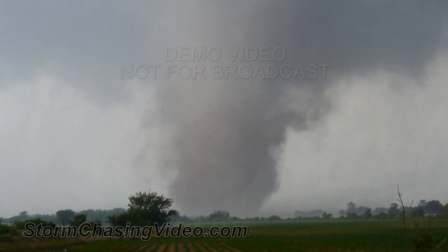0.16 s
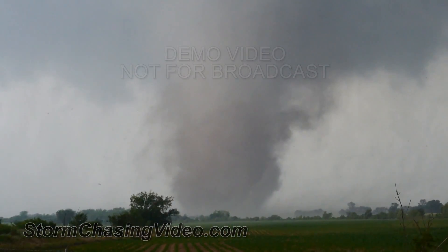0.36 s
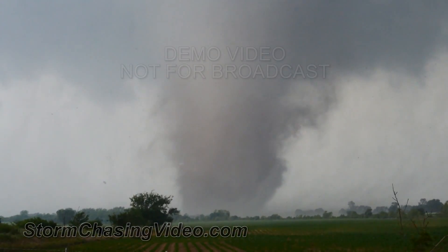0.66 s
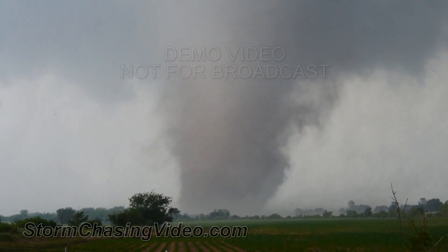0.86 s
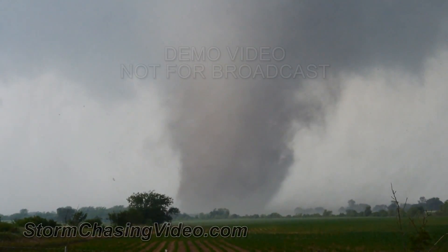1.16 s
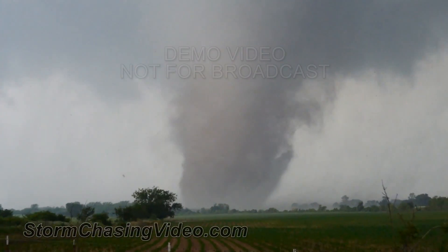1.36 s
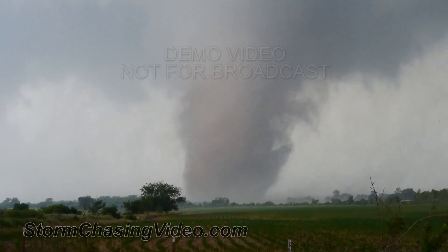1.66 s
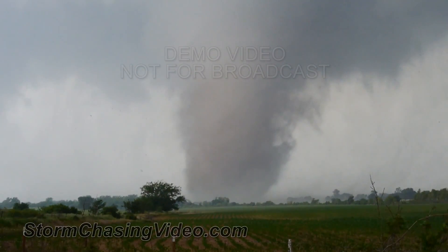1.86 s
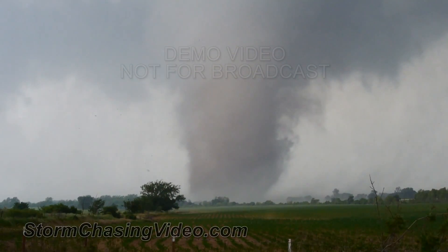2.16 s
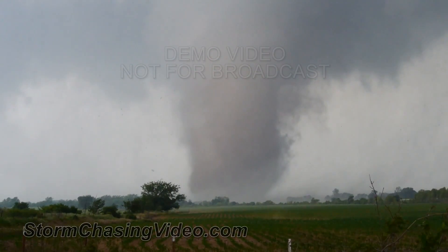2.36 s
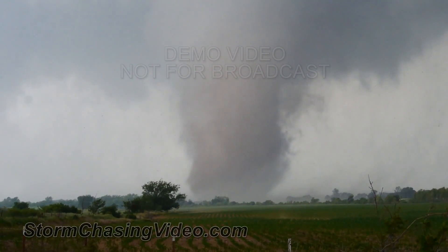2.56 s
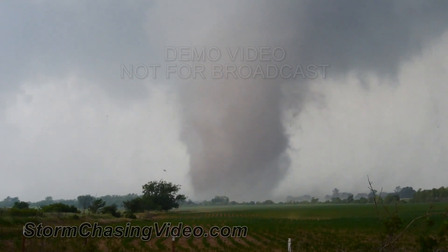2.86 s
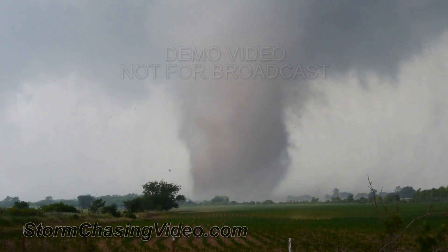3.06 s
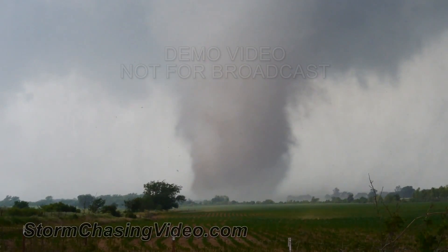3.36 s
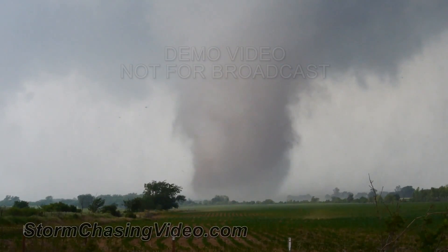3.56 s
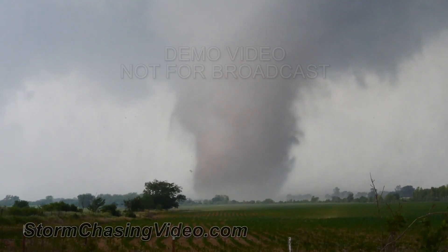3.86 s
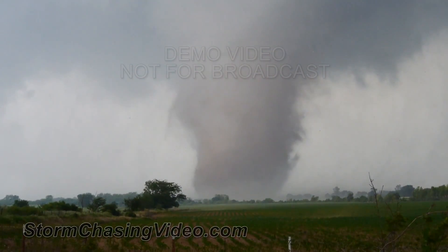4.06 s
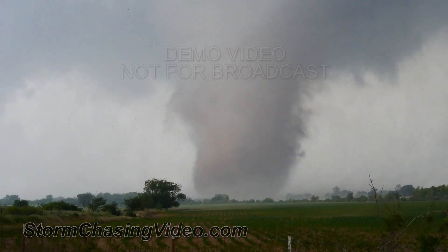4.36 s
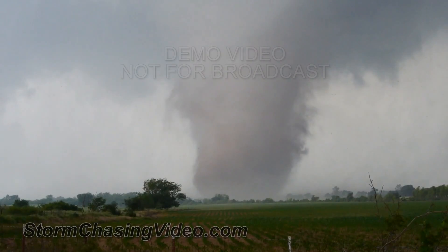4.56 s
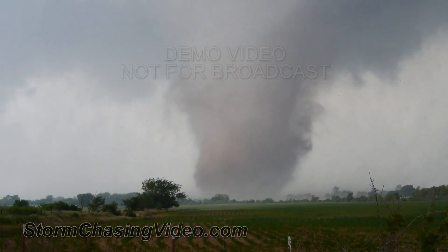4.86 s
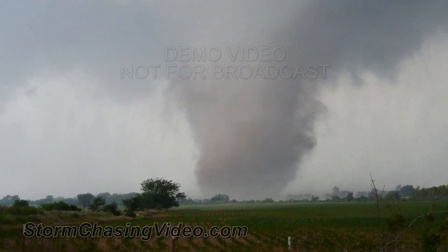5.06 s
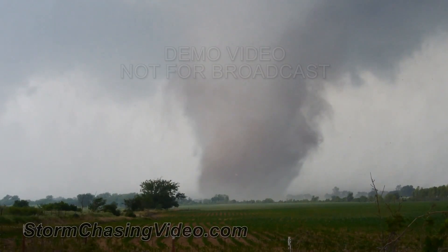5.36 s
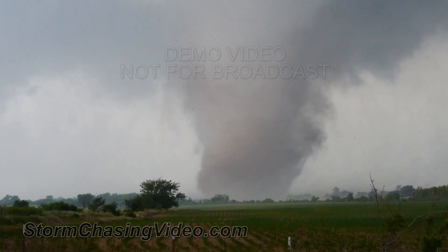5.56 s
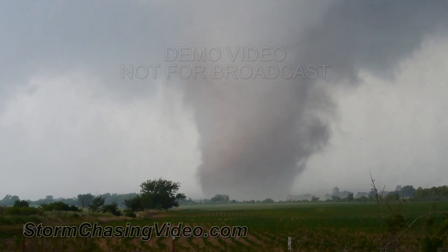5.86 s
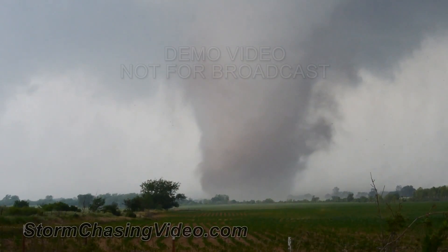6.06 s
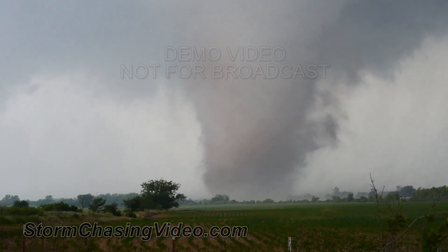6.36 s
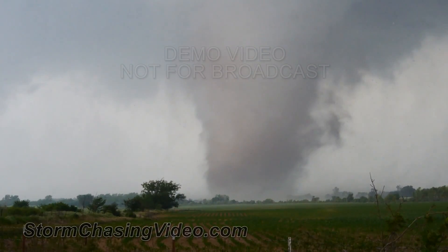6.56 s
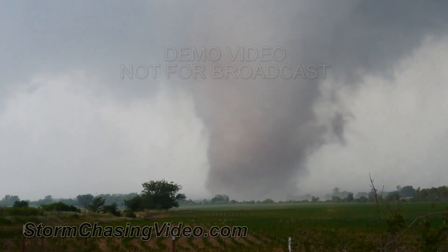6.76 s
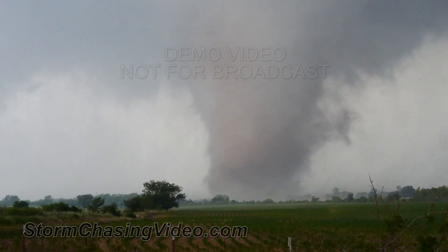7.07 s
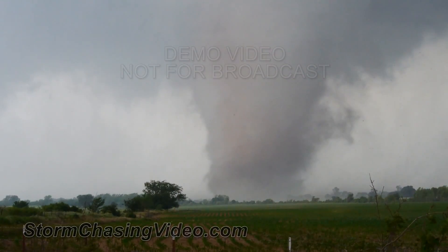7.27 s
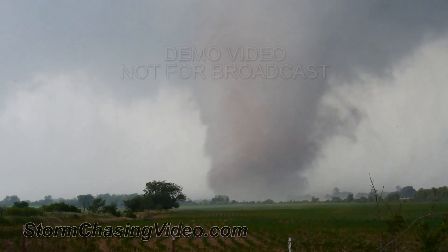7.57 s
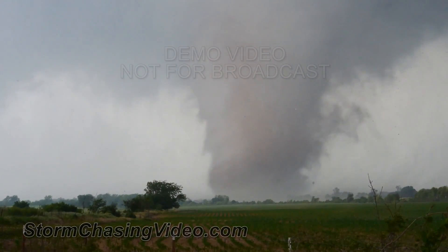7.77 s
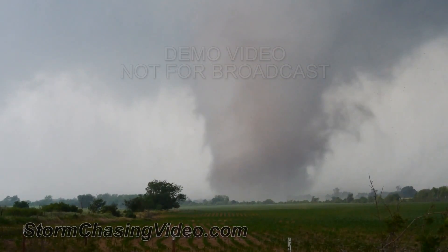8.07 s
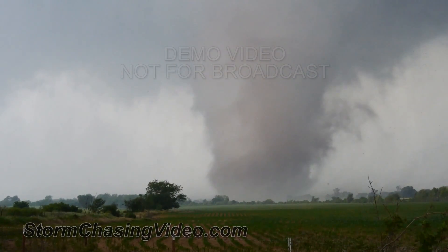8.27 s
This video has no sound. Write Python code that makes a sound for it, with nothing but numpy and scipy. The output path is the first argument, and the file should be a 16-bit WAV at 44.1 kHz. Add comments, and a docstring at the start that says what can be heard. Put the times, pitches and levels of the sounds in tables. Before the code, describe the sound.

Wind buffets a microphone in an open field from the start, with very low swelling pressure, irregular dull thuds and quick fluttering; strong knocks land near 0.25 and 0.8 s. A far tornado roars softly underneath, with a muted rush of air and a faint hiss of grass and leaves. Tiny, thin bird chirps glide by at about 0.9 to 1.1 s. The roar gradually thickens through 2 to 5 s, with a brief hollow note near 3.4 s and heavy wind pushes around 2.6 and 4.1 s, the latter with faint ticks. From 5.4 s the deepest wind pressure eases while the roar climbs, peaking near 6 s in a wavering, low howl. Strong buffeting returns at 6.9 to 7.1 s, briefly ducking everything, with another short chirp. The roar falls back by 7.4 s, then swells again unevenly until the end at about 8.4 s.

```python
"""Gusty wind buffets a microphone: noise bands swell, thud, flutter and ruffle as eddies of every size pass,
with blunt slaps (damped sines), tiny ticks (filtered impulses) and brief changes of level.
Behind it a large tornado roars over open fields and wind hisses through grass and trees: noise bands
that follow one long gust, with a howl that flares into wavering notes. A bird chirps thinly in gliding
harmonics over a faint, wide top hiss. Strong pushes duck the gain of the whole scene."""
import sys
import numpy as np
from scipy import signal
from scipy.fft import rfft, irfft
from scipy.io import wavfile
from scipy.ndimage import uniform_filter1d

SR = 44100
rng = np.random.default_rng(int(sys.argv[2]) if len(sys.argv) > 2 else 0)


def unload_audio(sound):
    """Save the sound as a 16-bit wav file, at the path given as the first command line argument."""
    columns = np.transpose(np.atleast_2d(sound))
    # keep every value between -1 and 1, then stretch to whole-number steps
    steps = np.round(np.clip(columns, -1, 1) * 32767)
    wavfile.write(sys.argv[1], SR, steps.astype(np.int16))


N = 370440

# heard level of the storm before trims, with brief dips:
# (time [s], roar level [dB], rush level [dB], hiss level [dB])
STORM_COURSE = [(0, -36, -38.5, -39.5), (0.35, -39, -42, -41.5), (0.7, -34, -39, -41),
                (0.98, -35.5, -40.5, -41.5), (1.35, -32, -39, -40), (1.8, -32.5, -37.5, -40),
                (2.0, -33, -38.5, -41), (2.7, -34, -40, -44), (2.9, -30.5, -39, -43),
                (3.38, -31, -36, -39.5), (3.52, -31.8, -38.5, -43), (4.1, -29.5, -36.5, -41),
                (4.3, -31, -37, -42), (4.5, -30, -36.5, -41.5), (5.15, -28.5, -35.5, -41.5),
                (5.55, -25, -32.5, -38.5), (6.0, -23, -31, -37.5), (6.27, -24, -31.5, -36.5),
                (6.4, -25, -33.6, -39), (6.84, -26.5, -33.5, -39), (6.885, -27.5, -35.5, -41),
                (7.37, -30, -36, -42.5), (7.47, -28.5, -37.5, -43), (7.75, -25.5, -37.5, -43),
                (7.95, -28, -37, -43), (8.4, -25.5, -33.5, -39.5)]


def from_db(db):
    """Level definition: an amplitude ratio is ten to the power of decibels over twenty."""
    return 10 ** (np.asarray(db) / 20)


def rms_one(x):
    """Power normalization: dividing by the root mean square gives unit power."""
    return x / np.sqrt(np.mean(x ** 2) + 1e-20)


def in_time(rows):
    """Linear interpolation: straight lines join each column of a curve at every sample."""
    s, *columns = np.transpose(rows)
    return [np.interp(np.arange(N) / SR, s, column) for column in columns]


def at_bins(points):
    """Logarithmic frequency scale: a table is read at every FFT bin along log frequency."""
    hz, value = np.transpose(points)
    bin_hz = np.maximum(np.arange(N // 2 + 1) * SR / N, 1)
    return np.interp(np.log(bin_hz), np.log(hz), value)


def noise(spectrum):
    """Spectral shaping: white noise is coloured to unit power and dies away beyond its table."""
    octave_below, octave_above = spectrum[0][0] / 2, spectrum[-1][0] * 2
    closed = [(octave_below, -120), *spectrum, (octave_above, -120)]
    white = rfft(rng.standard_normal(N))
    return irfft(white * rms_one(from_db(at_bins(closed))), N)


def drift(rate_hz):
    """Low-pass random process: noise loses its changes above the rate and is scaled to spread 1."""
    hz = np.arange(N // 2 + 1) * SR / N
    white = rfft(rng.standard_normal(N))
    return rms_one(irfft(white / (1 + (hz / rate_hz) ** 2), N))


def evened(x, span_s):
    """Short-time power normalization: a noise is held steady so that its envelope sets its strength."""
    size = max(int(span_s * SR), 2)
    power = uniform_filter1d(uniform_filter1d(x ** 2, size), size)
    return x / np.sqrt(np.abs(power) + 1e-9)


def bell(s, half_s):
    """Gaussian envelope: a smooth rise and fall of height 1, down to 1/e at half_s from its centre."""
    return np.exp(-np.minimum(((np.arange(N) / SR - s) / half_s) ** 2, 20))


def eddies(rows, rise_s, fall_s):
    """Addition of powers: each passing eddy adds a Gaussian pulse with its own rise and fall."""
    t, power = np.arange(N) / SR, np.zeros(N)
    for s, db in rows:
        width_s = np.where(t < s, rise_s, fall_s)
        power += from_db(db) ** 2 * np.exp(-np.minimum(((t - s) / width_s) ** 2, 20))
    return power


def sizzle(level_db, follow):
    """Uncorrelated channels: two independent treble noises sound wide and follow the rush of air."""
    # colour of the highest treble: (frequency [Hz], relative density [dB])
    sizzle_colour = [(7000, -22), (9500, -3), (11000, 4), (14000, 3)]
    _, rush_db, _ = in_time(STORM_COURSE)
    wide = np.array([noise(sizzle_colour), noise(sizzle_colour)])
    return wide * from_db(level_db + follow * (rush_db - rush_db.mean()))


def bird(flicker_db):
    """Harmonic synthesis: thin chirps glide along arched pitches; the wind makes each partial flicker."""
    # chirps: (time [s], length [s], first pitch [Hz], last pitch [Hz], arch of glide [Hz],
    # fundamental level [dB], overtone level [dB], pitch waver [share of pitch])
    chirp_rows = [(0.88, 0.048, 1850, 2310, 110, -44, -55, 0.037),
                  (0.92, .064, 2035, 1935, 75, -54, -53.5, 0.006),
                  (1.105, 0.068, 1970, 2130, 35, -57, -57, .006),
                  (6.953, .035, 1940, 2130, 50, -37, -64, .04)]
    # the bird's voice, one row per harmonic from the first: relative level [dB]
    voice = [0, -7, -5, -11, -17, -27]
    fade_s = 0.011
    out, t = np.zeros(N), np.arange(N) / SR
    unsteady = drift(240)
    flickers = [flicker_db * drift(50) for _ in voice]
    for s, length_s, first_hz, last_hz, arch_hz, level_db, overtones_db, waver in chirp_rows:
        along = np.clip((t - s) / length_s, 0, 1)
        hz = first_hz + (last_hz - first_hz) * along + arch_hz * np.sin(np.pi * along)
        phase = 2 * np.pi * np.cumsum(hz * (1 + waver * unsteady)) / SR
        sounding = np.clip(np.minimum(t - s, s + length_s - t) / fade_s, 0, 1)
        for k, (db, flicker) in enumerate(zip(voice, flickers), 1):
            partial_db = level_db if k == 1 else overtones_db
            out += sounding * from_db(partial_db + db + flicker) * np.sin(k * phase)
    return out


def flares():
    """Frequency modulation: for moments the howl gains a single note whose pitch wavers."""
    # flares: (time [s], half length [s], mean pitch [Hz], peak level [dB])
    flare_rows = [(3.39, 0.034, 320, -27), (5.817, .035, 338, -22), (6.016, 0.049, 292.7, -20),
                  (6.246, .04, 330, -25)]
    waver = 1 + 0.0497 * drift(40)   # spread as a share of the pitch
    out = np.zeros(N)
    for s, half_s, hz, db in flare_rows:
        phase = 2 * np.pi * np.cumsum(hz * waver) / SR
        out += from_db(db) * bell(s, half_s) * np.sin(phase)
    return out


def storm(roar_trim_db, rush_trim_db, hiss_trim_db, rumble_db, deepening, howl_db, howl_growth,
          churn_db, rustle_db):
    """Turbulent broadband sound: the funnel's roar, air rushing over fields and hissing leaves add up."""
    # short gusts: (time [s], half length [s], roar change [dB], rush change [dB], hiss change [dB])
    gust_rows = [(0.378, 0.055, 5.5, 0.8, 0), (1.55, .2, .5, 0.5, 0.2), (1.78, 0.054, 0, 1, 1.5),
                 (3.08, .07, -0.5, 1.5, 1), (3.39, 0.046, 0.5, 0, -1), (4.465, .05, 0, 0, -0.3),
                 (5.382, .05, 1, 0.5, 0.5), (6.02, .2, 0, 0.1, 0), (6.55, 0.072, 1, .3, 1),
                 (6.817, 0.04, 2, 0.5, 2.3), (7.33, 0.055, 0, 0.5, 1.2), (7.72, 0.078, 0, 2, 2)]
    # colours of roar, its deepest part, rush, leaf hiss and a narrow hollow note:
    # (frequency [Hz], relative density [dB])
    roar_colour = [(90, -18), (150, -7.5), (195, -4.5), (240, -1.5), (305, 0), (420, -0.5), (560, -7),
                   (750, -17.5), (1400, -41)]
    rumble_colour = [(75, -16), (115, 1), (150, 0.5), (205, -1), (265, -1), (340, -11.5)]
    rush_colour = [(350, -13), (620, 1.5), (800, 1), (1050, -2.5), (1550, -6), (2100, -11), (3000, -12.5),
                   (5000, -34.5), (8000, -38), (10500, -44), (14000, -54.5)]
    hiss_colour = [(1200, -33), (2100, -12.5), (2550, -2), (3250, 1.5), (4300, -7.5), (5200, -11),
                   (6200, -16.5), (7800, -23), (9300, -32), (11000, -43), (14000, -51)]
    howl_colour = [(235, -22.5), (280, -2.5), (310, -3), (350, -7.5), (400, -15)]
    gusts_db = sum(np.outer(changes_db, bell(s, half_s)) for s, half_s, *changes_db in gust_rows)
    roar_db, rush_db, hiss_db = in_time(STORM_COURSE) + gusts_db
    roar_swing_db = roar_db - roar_db.mean()

    churned = noise(roar_colour) * from_db(churn_db * drift(30))
    roar = evened(churned, span_s=0.25) * from_db(roar_db + roar_trim_db)
    # a stronger wind carries larger eddies, so rumble and howl grow faster than the roar
    rumble = evened(noise(rumble_colour), span_s=0.25) * from_db(rumble_db + deepening * roar_swing_db)
    howl = evened(noise(howl_colour), span_s=0.34) * from_db(howl_db + howl_growth * roar_swing_db)
    rush = noise(rush_colour) * from_db(rush_db + rush_trim_db)
    hiss = noise(hiss_colour) * from_db(hiss_db + hiss_trim_db)
    rustle = from_db(rustle_db * drift(6.4))
    return roar + rumble + howl + flares() + (rush + hiss) * rustle


def ticks(low_hz):
    """Impulse response: impulses whose lows a high-pass removes sound as faint, bright ticks."""
    # ticks: (time [s], impulse level before the high-pass [dB])
    tick_rows = [(2.148, -44), (3.471, -38), (4.1545, -32), (4.157, -30), (6.86, -42), (6.894, -35),
                 (7.435, -42.5)]
    clicks = np.zeros(N)
    for s, db in tick_rows:
        clicks[round(s * SR)] = from_db(db)
    high_pass = signal.butter(1, low_hz, "high", fs=SR, output="sos")
    return signal.sosfilt(high_pass, clicks + 1e-18)


def slaps():
    """Heavily damped oscillation: an eddy that hits head-on gives one blunt, low thump."""
    # slaps: (time [s], level before rise and decay [dB])
    slap_rows = [(0.418, -9), (0.757, -9), (3.808, -10), (4.13, -9), (4.437, -16), (5.408, -13),
                 (5.466, -15), (6.846, -12)]
    pitch_hz, decay_s, rise_s = 48, 0.012, 0.003
    out = np.zeros(N)
    for s, db in slap_rows:
        age = np.clip(np.arange(N) / SR - s, 0, 1)
        envelope = (1 - np.exp(-age / rise_s)) * np.exp(-age / decay_s)
        out += from_db(db) * envelope * np.sin(2 * np.pi * pitch_hz * age)
    return out


def buffeting(swell_trim_db, push_trim_db, thud_trim_db, flutter_trim_db, buffet_trim_db, ruffle_db,
              lumpy_db, restless_db):
    """Turbulent pressure: large eddies push slowly, smaller ones thud, the smallest flutter and ruffle."""
    # steady press of the wind, before trim: (time [s], level [dB])
    pressure_rows = [(0, -20), (1.9, -19), (3.0, -20.5), (5.1, -19.5), (5.35, -31.5), (5.95, -27.5),
                     (6.35, -17.5), (7.8, -18.5), (8.4, -24)]
    # small-scale turbulence, before trim: (time [s], flutter level [dB])
    turbulence_rows = [(0, -28.5), (0.2, -29.5), (0.85, -32), (1.02, -33), (1.4, -30.5), (2.35, -30),
                       (2.6, -32.5), (3.1, -33), (3.75, -32), (4.15, -30), (4.6, -35), (5.2, -29.5),
                       (6.2, -29), (6.8, -27), (7.15, -25), (7.55, -26), (7.95, -28.5), (8.4, -28.5)]
    # large eddies, then smaller ones, before trim: (time [s], peak level [dB])
    push_rows = [(1.85, -14.5), (2.62, -11), (3.46, -13.5), (4.14, -7.5), (4.53, -14.5), (5.04, -15),
                 (6.32, -14), (6.91, -11), (7.11, -9), (7.44, -14.5), (7.78, -15)]
    thud_rows = [(0.07, -22), (0.25, -9.5), (0.54, -15), (0.67, -18.5), (0.78, -6), (0.91, -18),
                 (1.16, -18), (1.46, -16), (1.6, -26), (1.9, -11), (2.14, -15.5), (2.39, -12.5),
                 (2.83, -18), (3.22, -28), (3.45, -14.5), (3.82, -17), (4.15, -18), (4.58, -16),
                 (4.88, -13.5), (5.42, -15), (6.62, -25), (6.86, -11.5), (6.94, -6), (7.11, -16),
                 (7.21, -21), (7.31, -18), (7.5, -19), (7.78, -15)]
    # bursts of turbulence, before trim: (time [s], half length [s], flutter level [dB], ruffle level [dB])
    buffet_rows = [(0.22, 0.07, -16.5, -23.5), (0.504, 0.058, -20.5, -29), (0.765, 0.061, -24, -25.5),
                   (0.91, 0.043, -25, -30), (1.188, 0.05, -25.5, -27.5), (1.427, 0.057, -22.5, -32),
                   (1.59, 0.047, -18, -30), (1.827, .07, -23, -30), (2.103, 0.058, -19.5, -27.5),
                   (2.26, 0.076, -20.5, -31), (2.813, 0.029, -28, -34), (3.42, 0.099, -37, -29),
                   (3.62, 0.031, -23, -50), (3.803, 0.029, -22, -34), (4.077, 0.034, -33, -42),
                   (4.496, 0.096, -20, -43), (4.784, 0.036, -23, -29), (5.004, .04, -24, -30),
                   (5.4, 0.047, -25.5, -34), (5.576, 0.06, -31, -25), (5.8, 0.14, -24, -33),
                   (6.195, 0.075, -27, -22.5), (6.633, 0.036, -22, -34), (6.87, 0.033, -26, -37),
                   (7.1, .04, -21, -26), (7.387, 0.039, -20, -20), (7.56, 0.086, -25, -31),
                   (8.128, 0.055, -34, -26), (8.362, 0.029, -22, -21.5)]
    # brief level changes of the near wind, mostly small dips: (time [s], half length [s], change [dB])
    level_change_rows = [(0.416, .04, 1), (1.026, 0.045, -6), (1.256, .03, -2), (2.71, 0.079, -1.5),
                         (2.917, 0.046, -4.5), (3.681, 0.028, 0), (3.966, 0.06, 1.5), (4.277, 0.034, -2),
                         (5.72, 0.089, -1.5), (8.22, .04, 0)]
    # colours from large eddies to the brighter ruffle: (frequency [Hz], relative density [dB])
    swell_colour = [(6, -43), (11, 2), (17, -1), (22, -10), (28, -34)]
    thud_colour = [(19, -6.5), (24, 1), (32, -2), (42, -4.5), (56, -11.5), (76, -21)]
    flutter_colour = [(44, -7), (58, -1.5), (78, -1), (98, -7.5), (130, -15.5)]
    ruffle_colour = [(82, -8), (108, -2), (128, -3.5), (175, -10), (230, -16), (300, -18.5), (700, -36.5)]

    pressure_db, = in_time(pressure_rows)
    flutter_db, = in_time(turbulence_rows)
    pushes = from_db(push_trim_db) * np.sqrt(eddies(push_rows, rise_s=0.066, fall_s=0.054))
    strong = from_db(thud_trim_db) * np.sqrt(eddies(thud_rows, rise_s=0.025, fall_s=0.027))
    # countless weak eddies thud in between, following part of the wind's swing
    weak = from_db(-24.5 + 0.5 * (pressure_db - pressure_db.mean())
                   + 0.37 * (flutter_db - flutter_db.mean()) + restless_db * drift(14))
    burst_power = np.zeros((2, N))
    for s, half_s, low_db, high_db in buffet_rows:
        burst_power += eddies([(s, 0)], half_s, half_s) * from_db([[low_db], [high_db]]) ** 2
    dull, bright = from_db(buffet_trim_db) * np.sqrt(burst_power)

    swell = evened(noise(swell_colour), span_s=0.046)
    thud = evened(noise(thud_colour), span_s=0.069)
    lumps = from_db(lumpy_db * thud)   # the thud's waveform modulates the finer turbulence
    flutter = evened(noise(flutter_colour) * lumps, span_s=0.08)
    ruffle = evened(noise(ruffle_colour) * lumps, span_s=0.074)

    # hypot adds the powers of the steady and the passing parts
    swelling = np.hypot(from_db(pressure_db + swell_trim_db), pushes) * swell
    thudding = np.hypot(strong, weak) * thud
    fluttering = np.hypot(from_db(flutter_db + flutter_trim_db), dull) * flutter
    ruffling = np.hypot(from_db(flutter_db + ruffle_db), bright) * ruffle
    level_changes = from_db(sum(db * bell(s, half_s) for s, half_s, db in level_change_rows))
    return level_changes * (swelling + thudding + fluttering + ruffling)


def gain_control(x):
    """Dynamic range compression: power above a threshold cuts the gain, which then creeps back."""
    threshold_db, cut_db_per_db = -9.5, 0.72
    recovery_db_per_s, window_s = 15.5, 0.033
    power = uniform_filter1d(np.mean(x ** 2, axis=0), max(int(window_s * SR), 2))
    level_db = 10 * np.log10(np.abs(power) + 1e-12)
    cut_db = cut_db_per_db * np.maximum(level_db - threshold_db, 0)
    recovery_db = recovery_db_per_s * np.arange(N) / SR
    # the running maximum holds the deepest cut while it recovers at a constant rate
    return x * from_db(recovery_db - np.maximum.accumulate(cut_db + recovery_db))


def scene():
    """Superposition: far storm, bird and near wind add up in the centre; only the sizzle is wide."""
    top = sizzle(level_db=-77.0, follow=0.9)
    chirps = bird(flicker_db=4.5)
    far = storm(roar_trim_db=-1.02, rush_trim_db=-0.1, hiss_trim_db=-1.17, rumble_db=-36.5, deepening=1.2,
                howl_db=-43.5, howl_growth=1.63, churn_db=1.07, rustle_db=0.36)
    wind = buffeting(swell_trim_db=1.96, push_trim_db=1.0, thud_trim_db=-0.5, flutter_trim_db=0.5,
                     buffet_trim_db=-3.0, ruffle_db=-5.5, lumpy_db=2.0, restless_db=0.5)
    near = wind + slaps() + ticks(low_hz=7500)
    return near + far + chirps + top


def record(dry):
    """Saturation and band limiting: gain ducks, peaks are rounded, ends are eased and the top is cut."""
    held = gain_control(dry)
    rounded = held / (1 + np.abs(held / 0.95) ** 8) ** (1 / 8)
    to_nearest_end = np.minimum(np.arange(N), np.arange(N)[::-1])
    eased = np.minimum(1, to_nearest_end / (0.004 * SR))   # 4 ms fades
    low_pass = signal.ellip(10, 0.1, 80, 14050, fs=SR, output="sos")   # cutoff in Hz
    return signal.sosfilt(low_pass, rounded * eased)


dry = scene()
out = record(dry)
unload_audio(out)
```